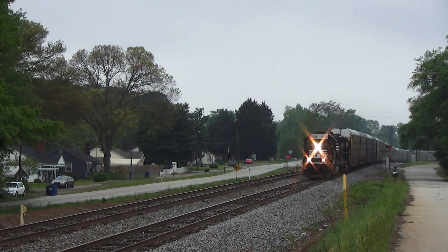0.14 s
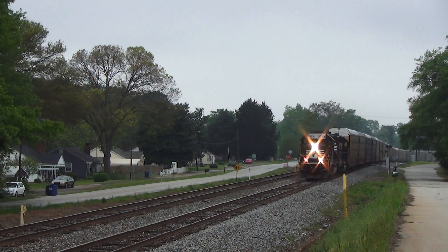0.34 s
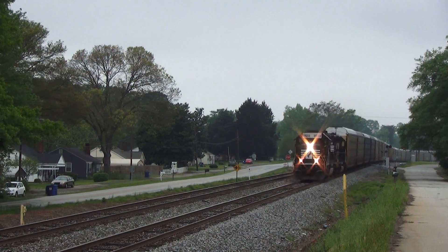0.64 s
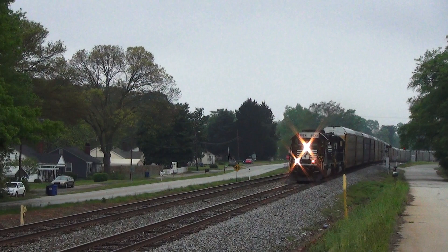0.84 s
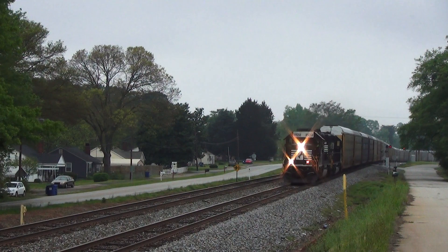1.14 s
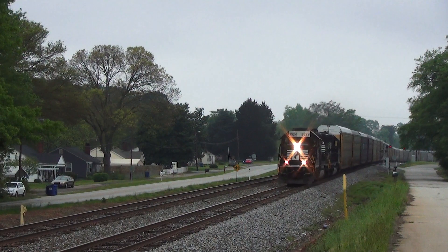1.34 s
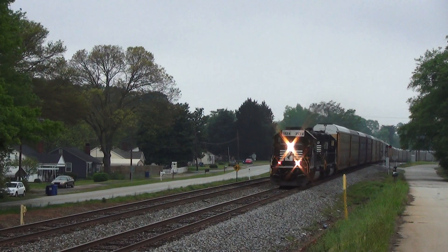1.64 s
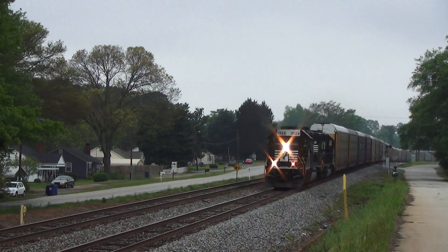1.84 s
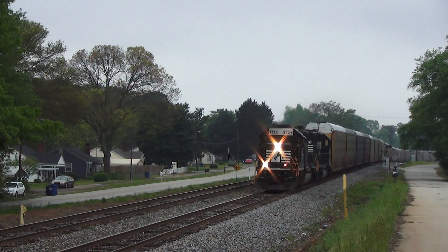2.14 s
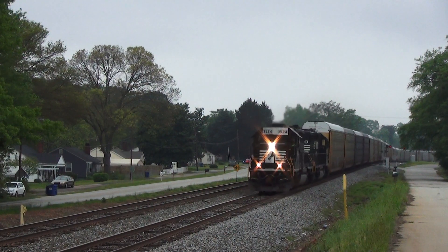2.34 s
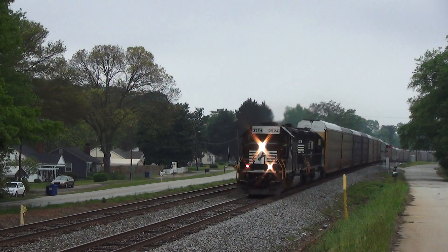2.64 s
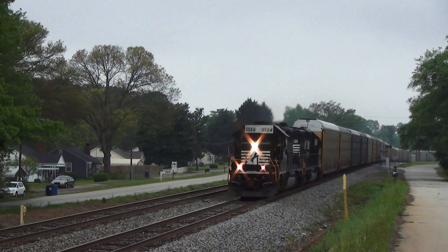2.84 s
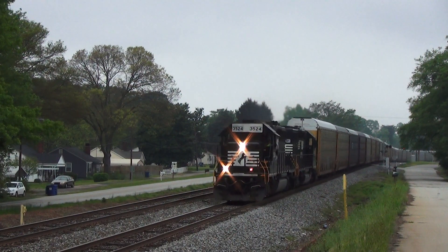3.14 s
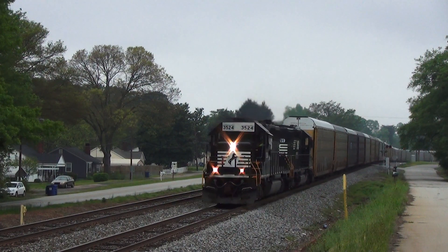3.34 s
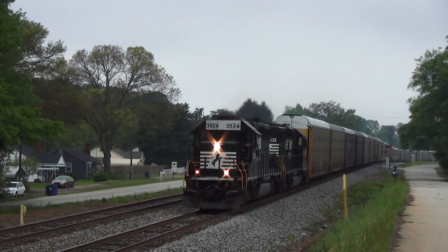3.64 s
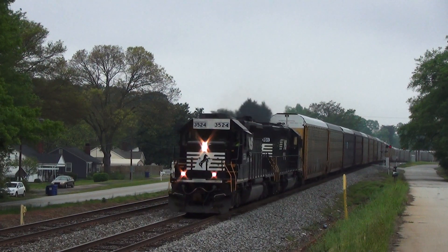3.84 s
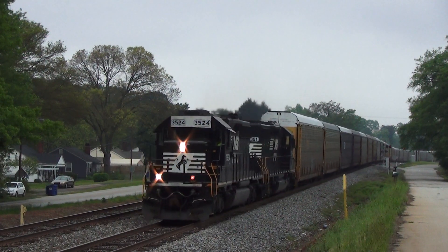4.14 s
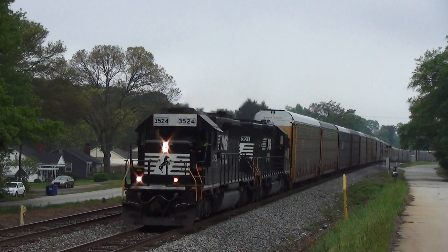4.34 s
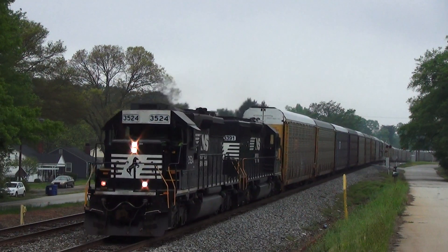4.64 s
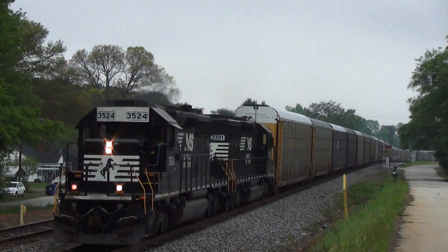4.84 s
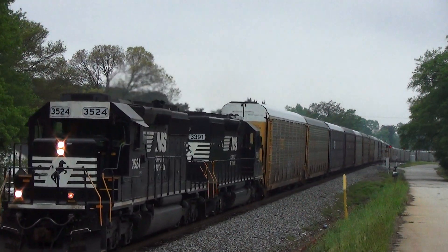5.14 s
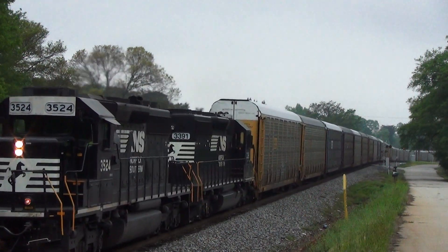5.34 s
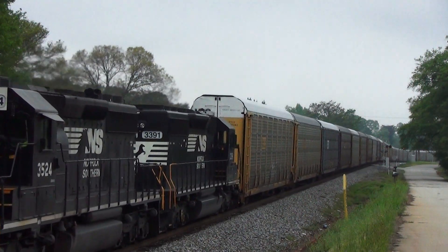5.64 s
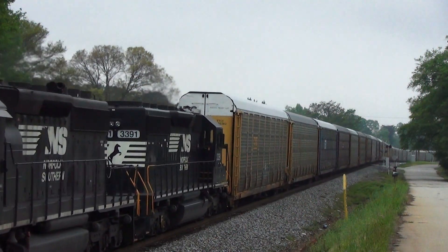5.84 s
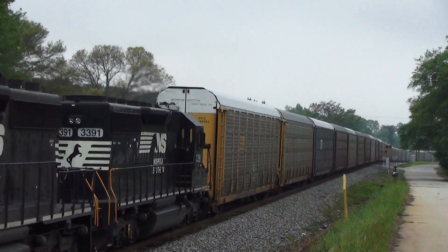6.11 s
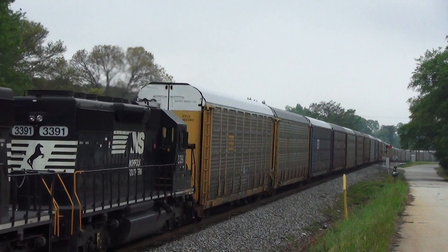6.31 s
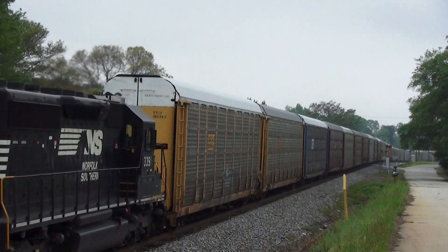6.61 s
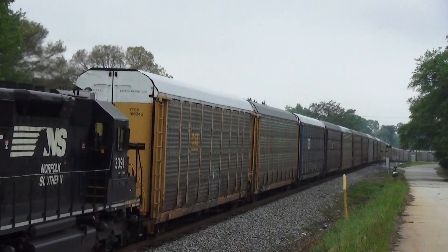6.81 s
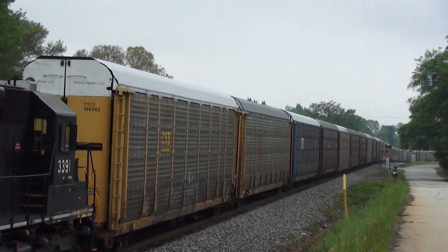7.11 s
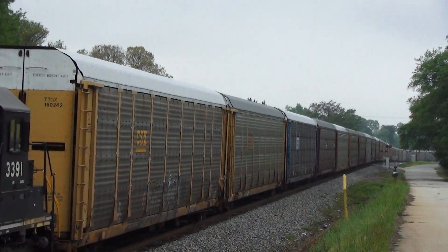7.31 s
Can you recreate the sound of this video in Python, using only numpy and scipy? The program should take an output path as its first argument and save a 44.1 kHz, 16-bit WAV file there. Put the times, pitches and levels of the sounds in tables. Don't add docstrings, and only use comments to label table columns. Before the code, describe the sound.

Outdoors beside a residential railway, a fixed stereo microphone hears two diesel locomotives approaching. A low, nearly steady exhaust drone throbs and beats, with softer rumble and hiss beneath. Around four seconds a few stones tick in the ballast. The engines grow louder and pass on the left near six to seven seconds, with strong roar, air hiss and whining gears, then the drone sags slightly.

```python
import sys
import numpy as np
from scipy import signal
from scipy.fft import rfft, irfft, next_fast_len
from scipy.io import wavfile
from scipy.ndimage import uniform_filter1d, map_coordinates

SR = 44100
rng = np.random.default_rng(int(sys.argv[2]) if len(sys.argv) > 2 else 0)


def int16_out(signal):
    q = np.round(np.clip(np.atleast_2d(signal).T, -1, 1) * 32767)
    wavfile.write(sys.argv[1], SR, q.astype(np.int16))


def boost_factor(decibels):
    exponent = np.asarray(decibels, float) / 20
    return 10 ** exponent


N = 329427

# time in seconds, then lead, second and echo speed in turns/s.
CRANK_SPEED = [(0.0, 11.649, 11.497, 11.184), (0.8, 11.665, 11.594, 11.292), (1.6, 11.668, 11.602, 11.391),
               (2.5, 11.663, 11.579, 11.246), (3.2, 11.679, 11.606, 11.291), (4.4, 11.669, 11.584, 11.118),
               (5.6, 11.677, 11.619, 11.172), (6.6, 11.622, 11.629, 10.965), (7.0, 11.405, 11.51, 10.922),
               (7.47, 11.073, 11.559, 11.356)]
# time in seconds, then lead, second and echo level in dB.
FIRING_LEVEL = [(0.0, -21.0, -19.1, -30.6), (0.6, -21.2, -24.8, -33.9), (1.3, -17.6, -21.2, -29.4),
                (1.9, -20.0, -25.0, -28.0), (2.6, -19.0, -22.7, -20.0), (3.1, -18.6, -21.5, -33.9),
                (3.8, -20.5, -20.1, -23.2), (4.7, -16.3, -20.7, -37.4), (5.4, -18.9, -21.1, -43.5),
                (6.2, -14.1, -14.8, -35.4), (6.8, -17.8, -22.7, -48.4), (7.1, -19.5, -26.9, -32.6),
                (7.47, -22.7, -28.0, -34.5)]
# order in cycles per turn, then lead, second and
# echo level in dB, then lead, second and echo crank offset in turns.
STACK_ORDERS = [(7.0, -19.7, -18.4, -29.8, 0.2, 0.12, 0.16), (8.0, 0.0, 0.0, 0.0, 0.85, 0.24, 0.74),
                (9.0, -12.7, -14.8, -20.7, 0.53, 0.51, 0.56), (10.0, -24.2, -25.4, -29.3, 0.68, 0.18, 0.76)]
# order in cycles per turn, lead and second level in dB.
UNEVEN_ORDERS = [(4.046, -39, -27), (4.94, -27.5, -36.5), (6.01, -26.5, -31), (10.85, -30.5, -34.5),
                 (11.91, -26.5, -36), (12.72, -33, -28), (13.94, -29, -38), (14.94, -25.5, -32.5),
                 (16.15, -20, -33.5), (17.08, -27, -35), (18.06, -23.5, -37.5), (18.79, -22.5, -26.5),
                 (20, -32, -36.5), (20.91, -30, -37.5), (22.96, -31, -35), (25.23, -38.5, -39)]
# time in seconds, centre in Hz, level in dB.
FAN_BAND = [(0, 9000, -63), (.4, 8950, -69), (2.4, 9300, -62.5), (3.1, 9310, -53), (4.5, 9070, -50),
            (6.2, 9300, -52.5), (6.95, 9440, -51), (7.1, 9560, -43.5), (7.47, 9440, -38.5)]
# frequency in Hz, density in dB per Hz.
RUMBLE_COLOUR = [(12, -64), (20, -21), (37, -22.5), (63, -19), (92, -1.5), (130, -13.5), (200, -8.5),
                 (308, -13.5), (450, -19.5), (600, -59), (990, -120)]
# frequency in Hz, density in dB per Hz.
BODY_COLOUR = [(180, -27), (300, -3), (408, -1), (505, -3.5), (687, -6), (874, -9.5), (981, -9.5),
               (1360, -15), (1640, -11), (2670, -18.5), (3000, -29), (3900, -47), (6600, -120)]
# frequency in Hz, density in dB per Hz.
FAR_HISS_COLOUR = [(1530, -9.5), (2600, -27.5), (2870, -22), (3250, 0.5), (3610, -8.5), (4260, -2.5),
                   (5020, -9), (6230, -2.5), (8160, -10.5), (9200, -10), (10200, -20), (10800, -59),
                   (11400, -25), (15500, -26)]
# frequency in Hz, density in dB per Hz.
NEAR_HISS_COLOUR = [(1530, -10.5), (2600, -24), (2950, -4), (3250, 0.5), (3530, -3.5), (4760, -7),
                    (6420, 2), (8410, -8), (9550, -4.5), (10100, -8), (10700, -20.5), (11900, -16),
                    (14500, -24), (15500, -23)]
# start in seconds, length in seconds, level of three wheel modes in dB, fizz in dB.
FLANGE_SQUEALS = [
    (.34, 0.22, -68, -83, -81, -85),
    (1.94, 0.27, -74, -78, -72, -64.5),
    (3.06, 0.24, -65, -84, -84, -69),
    (3.88, 0.17, -79, -88, -90, -85),
    (5.37, .3, -70, -70, -74, -83),
    (5.93, .3, -68, -76, -76, -83),
]
WHEEL_MODES = [14723, 14863, 14917]
# start in seconds, peak in dB.
BALLAST_TICKS = [
    (0.6664, -44),
    (3.921, -31),
    (3.969, -38),
    (3.9833, -30),
    (3.99, -32),
    (4.0083, -31),
    (4.022, -35),
    (4.0407, -27),
    (4.047, -32),
]
# time in seconds, left minus right in dB.
TRAIN_LEAN = [(0.0, 1), (1.0, 1.5), (1.66, 3.0), (3.33, 2.5), (3.62, 6.5), (4.83, 5.5), (5.39, 7.5),
              (6.82, 16), (7.18, 32), (7.47, 25)]
# frequency in Hz, left minus right in dB.
LEAN_AHEAD = [(60, -1.5), (110, 0), (200, -0.5), (380, 8.5), (700, 12.5), (1290, 5.5), (2380, 2),
              (4400, -0.5), (8120, 0.5), (15000, -4)]
# frequency in Hz, left minus right in dB.
LEAN_BESIDE = [(60, -2), (110, 8.5), (200, 6.5), (380, 23), (700, 22.5), (1290, 12), (2380, 9.5),
               (4400, 0.5), (8120, 3), (15000, -22)]
# frequency in Hz, level in dB.
STREET_SHARE = [(30, -33.5), (90, -12), (150, -15), (300, -15), (640, -18), (1400, -20), (3100, -17),
                (5000, -30), (7000, -16), (10000, -14)]
# time in seconds, level over mid approach in dB.
NEARNESS = [(0, -5.5), (.45, -9), (1.4, -6.5), (2.6, -6), (3.0, -2.5), (3.9, -3.5), (4.45, 0), (5.5, .5),
            (6.0, 4), (6.3, 8.5), (6.72, 9), (7.12, 4.5), (7.47, 6)]
PART_LEVELS = {"rumble": (-38, 0.83), "body": (-41, 0.74), "hiss": (-45, 1.013), "bark": (-15, .7),
               "chuff": (0.73, .05), "drive": (-47, .8), "drive 2": (-54, .9), "drive 4": (-55, 1.03),
               "blower": (-61, 1.05), "pump": (-58, 0.98), "alternator": (-55, .3),
               "second gear": (-79.5, .05), "low halo": (-49.5, 0.94), "mid halo": (-51, .6),
               "high halo": (-47, 0.99)}
# part name, time in seconds, half width in
# seconds, swell in dB (negative for a dip).
PART_SWELLS = [("drive", 5.85, 0.096, 6.8), ("drive", 6.62, 0.16, 13), ("drive", 7.26, 0.13, 11.3),
               ("drive 2", 6.18, 0.16, 11), ("drive 2", 6.75, .06, 7), ("rumble", 7.35, .15, 4),
               ("drive 4", 6.02, 0.27, 8.8), ("drive 4", 6.87, .2, 9.3), ("drive 4", 8, .07, 5.6),
               ("blower", 6.68, 0.43, 9.6), ("blower", 7.24, .25, 15), ("pump", 6.55, 0.61, 8.6),
               ("alternator", 6.7, .12, 18), ("alternator", 7.4, 0.13, 17), ("second gear", 1.8, 2.1, 20),
               ("second gear", 6.9, 0.23, 40), ("second gear", 7.4, .15, 36),
               ("high halo", 6.54, 0.72, -16), ("low halo", 7.47, 0.23, 7), ("low halo", .05, .3, 5),
               ("bark", 6.97, 0.57, -12), ("hiss", 7.32, 0.091, 4.8), ("body", 6.6, 0.16, 4.4),
               ("body", 6.2, 0.29, 3), ("body", 6.95, 0.21, 3.5), ("rumble", 6.8, 0.26, 4.6),
               ("bark", 5.71, .3, 3.3), ("chuff", 4.2, 0.42, -2), ("chuff", 6.86, 0.42, 3.1)]


def unit(x):
    return x / np.sqrt(np.mean(np.abs(x) ** 2) + 1e-20)


def along(points, hz):
    point_hz, value = np.transpose(points)
    return np.interp(np.log(hz + 1), np.log(point_hz + 1), value)


def curves(rows):
    s, *columns = np.transpose(rows)
    t = np.arange(N) / SR
    return np.array([np.interp(t, s, column) for column in columns])


def angle(hz):
    return 2 * np.pi * np.cumsum(hz, axis=-1) / SR


def wobble(rate):
    knots = rng.standard_normal(N // 40)
    return map_coordinates(knots, [np.arange(N) * min(rate, 1000) / SR])


def rush(spectrum, lo_hz, hi_hz, patchy_db):
    z = signal.stft(rng.standard_normal(N + 1024), nperseg=1024)[2]
    patches = uniform_filter1d(rng.standard_normal(z.shape), size=10, axis=0, mode="wrap")
    patches = uniform_filter1d(patches, size=6, axis=1, mode="wrap")
    noise = signal.istft(z * boost_factor(patchy_db * unit(patches)), nperseg=1024)[1]
    length = next_fast_len(N)
    hz = np.fft.rfftfreq(length, 1 / SR)
    coloured = rfft(noise, length) * boost_factor(along(spectrum, hz))
    band = (hz > lo_hz) & (hz < hi_hz)
    band_rms = np.sqrt(2) * np.linalg.norm(coloured[band]) / length
    return irfft(coloured, length)[:N] / band_rms


def part(name):
    base_db, grows = PART_LEVELS[name]
    t = np.arange(N) / SR
    level = base_db + grows * curves(NEARNESS)[0]
    for who, s, width, db in PART_SWELLS:
        if who == name:
            level = level + db * np.exp(-((t - s) / width) ** 2)
    return level


def chuffing(offset):
    return part("chuff") * np.cos(angle(curves(CRANK_SPEED)[0]) + offset)


def exhausts():
    crank, firing = angle(curves(CRANK_SPEED)), boost_factor(curves(FIRING_LEVEL))
    drone = 0
    for row in np.array(STACK_ORDERS):
        order, level_db, offset = row[0], row[1:4, None], row[4:, None]
        drone = drone + firing * boost_factor(level_db) * np.cos(order * crank + 2 * np.pi * offset)
    bark = 0
    for order, *levels_db in UNEVEN_ORDERS:
        low_order_db = -5 * (order < 7)
        unsteady = boost_factor(2.1 * wobble(1.514) + low_order_db)
        for engine, db in enumerate(levels_db):
            bark = bark + unsteady * boost_factor(db) * np.cos(order * crank[engine] + rng.uniform(0, 6.42))
    return drone.sum(0) + boost_factor(part("bark")) * bark


def passing(hz, climb, pass_s, spread_s, mach):
    t = np.arange(N) / SR
    approach = (t - pass_s) / np.hypot(t - pass_s, spread_s)
    return hz * (1 + climb * t) * (1 - mach * approach)


def twin(turn):
    bounce = boost_factor(-11 + 3 * wobble(9)) * np.cos(turn * (1 - 1 / 80) + wobble(15))
    return 1.3 * (np.cos(turn + .2 * wobble(25)) + bounce)


def lead_gears():
    drive = angle(passing(393.5, climb=.0026, pass_s=7.115, spread_s=.545, mach=.055))
    blower = angle(passing(3136., climb=.0022, pass_s=7.3, spread_s=.453, mach=.06))
    beat_db = chuffing(0.89)
    # part, shaft angle, share of the crank pulse, flutter in dB
    tones = [("drive", drive, .3, 1.5), ("drive 2", 2 * drive, .8, 2.2),
             ("drive 4", 4 * drive, 2.2, 1.2), ("blower", blower, 1.3, 1.4)]
    whine = boost_factor(part("pump") + 1.5 * wobble(15)) * twin(drive * 16 / 9)
    for name, turn, depth, flutter_db in tones:
        whine = whine + boost_factor(part(name) + depth * beat_db + flutter_db * wobble(28)) * twin(turn)
    return whine


def second_gears():
    whine = 0
    for name, hz in [("alternator", 912.), ("second gear", 3342.)]:
        turn = angle(np.full(N, hz)) + 0.92 * wobble(27)
        whine = whine + boost_factor(part(name) + 0.83 * wobble(12)) * np.cos(turn)
    return whine


def gear_halo():
    halo = 0
    for name, top_hz, width_hz in [("low halo", 918, 130), ("mid halo", 1685, 150), ("high halo", 3360, 290)]:
        skirt = [(20, -120), (top_hz - width_hz * 2.3, -40), (top_hz - width_hz, -5),
                 (top_hz - width_hz * 0.16, -1.5), (top_hz, 0), (top_hz + 25, -60), (top_hz + 60, -120)]
        halo = halo + boost_factor(part(name)) * rush(skirt, 500, 4000, patchy_db=0.9)
    return halo


def electronics():
    return boost_factor(-83) * np.cos(angle(np.full(N, 11780.)))


def wheel_rumble(surge_db):
    return boost_factor(part("rumble") + .5 * surge_db) * rush(RUMBLE_COLOUR, 108, 410, patchy_db=2.5)


def body_roar(surge_db, chuff_db):
    level = part("body") + 0.57 * chuff_db + 0.85 * surge_db
    return boost_factor(level) * rush(BODY_COLOUR, 381, 1600, patchy_db=0.5)


def air_hiss(surge_db, chuff_db):
    hiss_db = part("hiss")
    close = np.clip((hiss_db + 50.5) / 10, 0, 1) ** 2
    far = np.sqrt(1 - close) * rush(FAR_HISS_COLOUR, 3600, 8300, patchy_db=0.66)
    near = np.sqrt(close) * rush(NEAR_HISS_COLOUR, 3960, 8300, patchy_db=1.9)
    return boost_factor(hiss_db + 0.5 * chuff_db + 0.46 * surge_db) * (far + near)


def cooling_fan(chuff_db):
    fan_hz, fan_db = curves(FAN_BAND)
    turn = angle(fan_hz)
    fan = unit(wobble(850) * np.cos(turn) + wobble(850) * np.sin(turn))
    fan = signal.sosfilt(signal.butter(10, 10150, fs=SR, output="sos"), fan)
    return boost_factor(fan_db + 0.28 * chuff_db + 1.34 * wobble(60)) * fan


def rolling():
    chuff_db, surge_db = chuffing(1.34), .6 * wobble(8)
    noise = wheel_rumble(surge_db) + body_roar(surge_db, chuff_db)
    return noise + air_hiss(surge_db, chuff_db) + cooling_fan(chuff_db)


def flange_squeals():
    out, t = np.zeros(N + SR), np.arange(SR // 2) / SR
    fizz_filter = signal.butter(4, 13900, "high", fs=SR, output="sos")
    for s, length, *modes_db, fizz_db in FLANGE_SQUEALS:
        swell = np.clip(t / .03, 0, 1) * np.exp(-(t / length) ** 2 * 2.5)
        fizz = signal.sosfilt(fizz_filter, rng.standard_normal(len(t)))
        squeal = boost_factor(fizz_db + 12.0) * swell * fizz
        for hz, db in zip(WHEEL_MODES, modes_db):
            chatter = 1.2 * np.sin(rng.uniform(90, 200) * t)
            squeal = squeal + boost_factor(db + 9) * np.cos(2 * np.pi * hz * t + rng.uniform(0, 7) + chatter)
        out[round(s * SR):][:len(t)] += swell * squeal
    return out[:N]


def ballast_ticks():
    out, t = np.zeros(N + SR), np.arange(SR // 2) / SR
    stone = signal.butter(2, [4600, 8200], "band", fs=SR, output="sos")
    for s, db in BALLAST_TICKS:
        tick = rng.standard_normal(len(t)) * boost_factor(db + 1.5 - 60 * t / .02)
        out[round(s * SR):][:len(t)] += signal.sosfilt(stone, tick)
    return out[:N]


def stack_lean(t):
    ahead_db, beside_db, level_s, swing_s = -1.3, 5.6, 6.38, .12
    sway_db = 1.1 * np.interp(t * SR, np.arange(N), wobble(7)) * np.exp(-(t / 5) ** 4)
    swing = (1 + np.tanh((t - level_s) / swing_s)) / 2
    return sway_db + ahead_db + (beside_db - ahead_db) * swing


def scene():
    halo = gear_halo()
    mid = exhausts() + lead_gears() + second_gears() + halo + electronics()
    mid = mid + rolling() + flange_squeals() + ballast_ticks()
    street = rolling() + np.roll(halo, SR // 9)
    hz, t, (mid_z, street_z) = signal.stft([mid, street], SR, nperseg=2048)
    s, lean_db = np.transpose(TRAIN_LEAN)
    swing = (np.interp(t, s, lean_db) - 8.5) / 15
    ahead, beside = along(LEAN_AHEAD, hz)[:, None], along(LEAN_BESIDE, hz)[:, None]
    is_drone = hz[:, None] < 135
    ratio = boost_factor(np.where(is_drone, stack_lean(t), ahead + (beside - ahead) * swing))
    side = mid_z * (ratio - 1) / (ratio + 1) + street_z * boost_factor(along(STREET_SHARE, hz))[:, None]
    side = side * (hz < 10900)[:, None]
    return signal.istft(np.array([mid_z + side, mid_z - side]), SR, nperseg=2048)[1][:, :N]


def top_cut(x):
    return signal.sosfilt(signal.butter(12, 15670, fs=SR, output="sos"), x)


def record(dry):
    length = next_fast_len(N)
    hz = np.fft.rfftfreq(length, 1 / SR)
    mix = irfft(rfft(dry, length) * (hz < 15700), length)[:, :N]
    return top_cut(mix)


dry = scene()
out = record(dry)
int16_out(out)
```